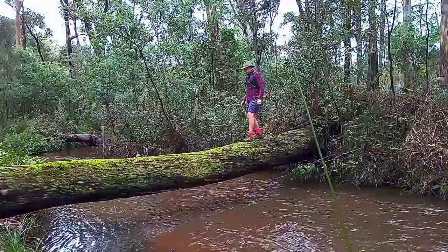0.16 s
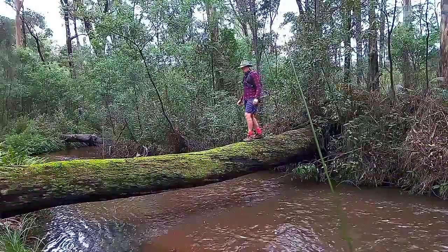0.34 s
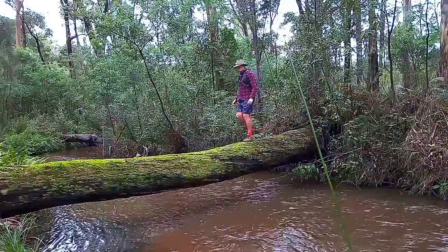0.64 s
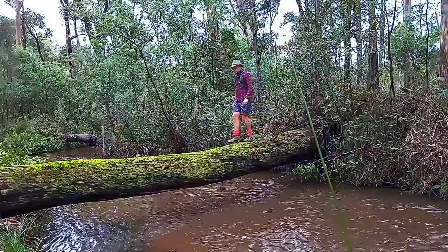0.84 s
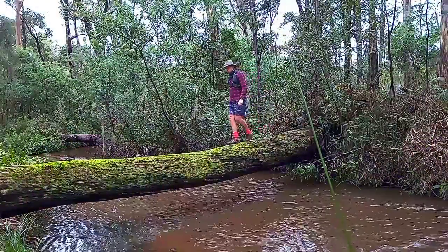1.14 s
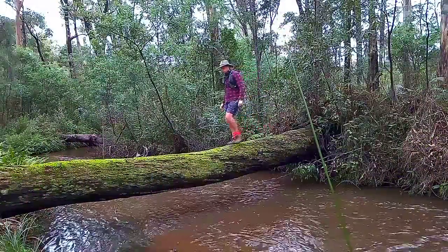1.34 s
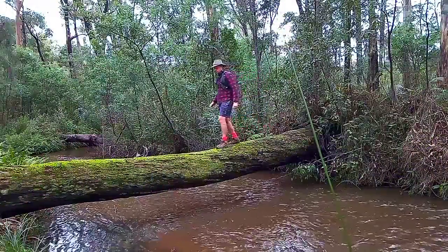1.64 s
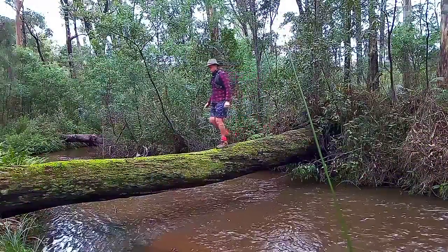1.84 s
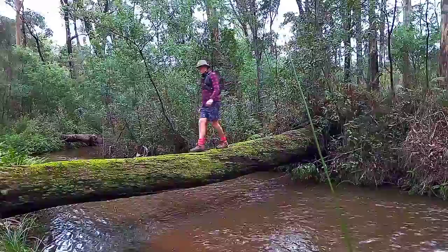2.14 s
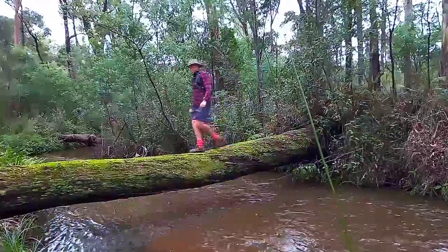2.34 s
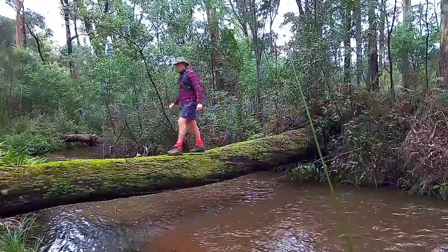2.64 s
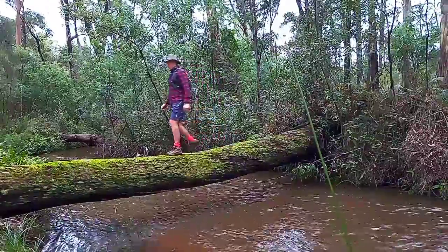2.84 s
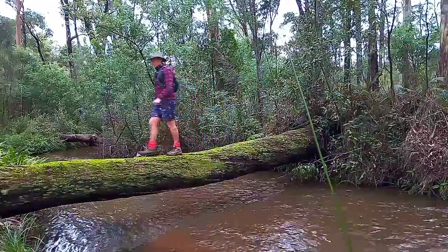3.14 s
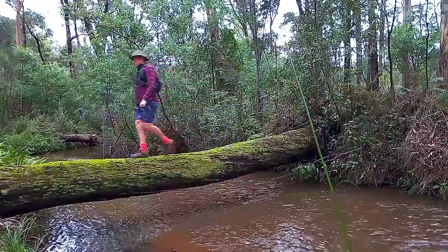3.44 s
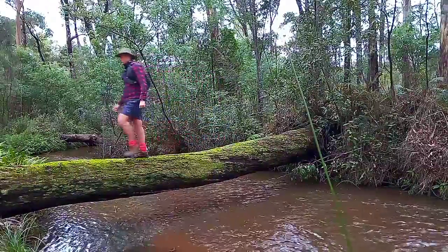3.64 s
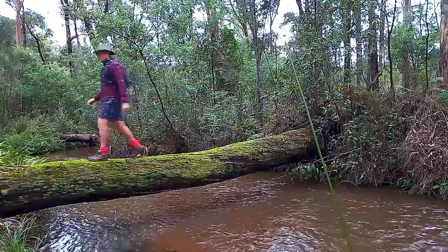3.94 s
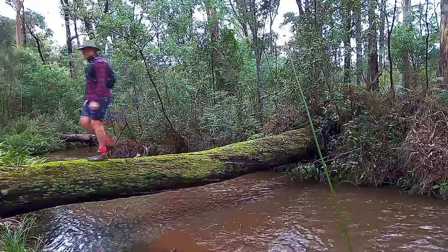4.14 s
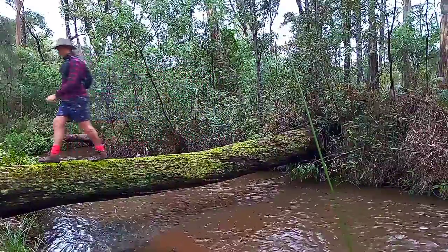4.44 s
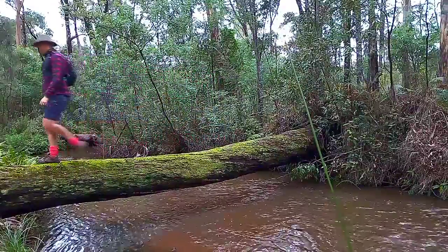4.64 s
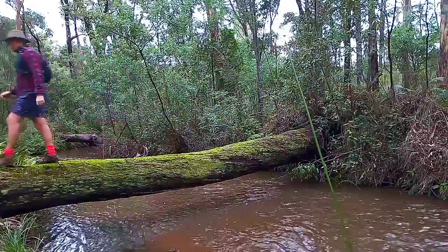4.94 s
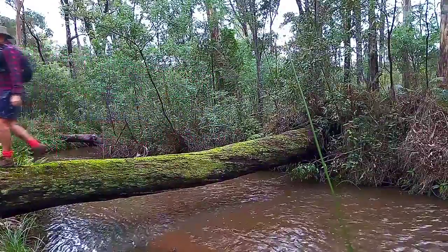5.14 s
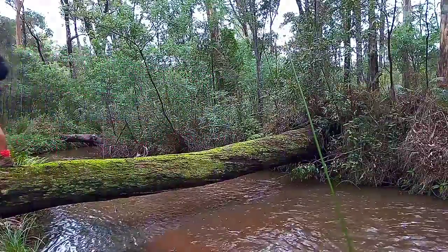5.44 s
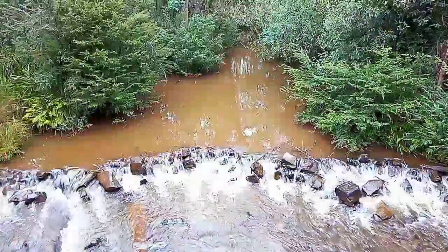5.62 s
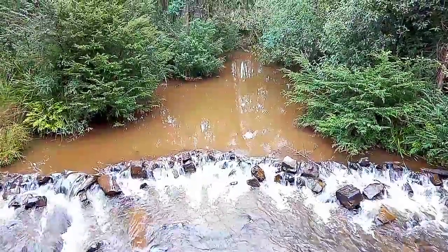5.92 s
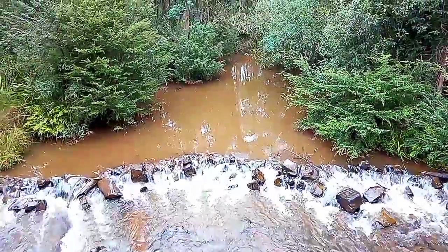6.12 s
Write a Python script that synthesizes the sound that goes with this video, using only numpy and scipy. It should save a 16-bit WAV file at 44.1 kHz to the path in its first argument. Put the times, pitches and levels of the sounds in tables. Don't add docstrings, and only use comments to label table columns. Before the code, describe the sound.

Outdoors in a wet forest, lively birds whistle, chirp, trill and rasp, their gliding calls ringing among the trunks. Drops tick on leaves around a stereo microphone, small bubbles gurgle at the bank, and a river murmurs softly behind. Light wind faintly rumbles. Near five and a half seconds a weir swells in quickly and roars steadily to the end, with a few last whistles.

```python
import sys
import numpy as np
from scipy import signal
from scipy.fft import rfft, irfft
from scipy.io import wavfile
from scipy.ndimage import uniform_filter1d, minimum_filter1d

SR = 44100
rng = np.random.default_rng(int(sys.argv[2]) if len(sys.argv) > 2 else 0)


def wrap_up_sound(samples):
    columns = np.atleast_2d(samples).T
    tamed = np.clip(columns, -1, 1)
    steps = np.round(tamed * 32767).astype(np.int16)
    wavfile.write(sys.argv[1], SR, steps)


def natural_amplitude(level_db):
    exponent = np.asarray(level_db, float) / 20
    return 10 ** exponent


N = 276948

# (time [s], level [dB])
WIND = [
    (0.12, -75),
    (0.26, -59),
    (3.83, -60),
    (3.93, -48.5),
    (4.39, -61.5),
    (5.44, -50),
    (5.73, -74),
    (6.23, -54),
    (6.28, -63),
]
# (time [s], gain [0-1])
FADE_IN = [
    (.15, 0),
    (.172, 0.3),
    (.19, 1),
]
# (frequency [Hz], density [dB per Hz])
MURMUR_COLOUR = [(29, -48), (50, -20), (69, -12), (249, -7.5), (452, -7.5), (699, -2), (1160, -1),
                 (1560, -4), (2960, -6.5), (3400, -9.5), (6170, -12), (12000, -20), (15600, -38),
                 (22000, -120)]
# (time [s], share [0-1])
DULL_START = [
    (.115, 0.94),
    (.15, 0.2),
]
# (frequency [Hz], density [dB per Hz])
RAPIDS_COLOUR = [(35, -47), (60, 13.5), (113, -33), (217, -6), (346, -8.5), (1170, -5.5), (1620, -9),
                 (2970, -8.5), (9790, -13), (16000, -14.5)]
# (time [s], level [dB])
WEIR = [
    (5.465, -61),
    (5.485, -52.5),
    (5.53, -46.5),
    (5.612, -39),
    (5.8, -39),
    (6.28, -39),
]
# (frequency [Hz], density [dB per Hz])
WEIR_COLOUR = [(53, -70.5), (90, -29), (147, -9.5), (262, -4.5), (697, -7), (941, -4), (2150, -3),
               (2320, -4.5), (3570, -13.5), (6510, -4), (7150, -10), (8000, -30.5), (10400, -68),
               (17600, -120)]
# (time [s], peak [dB], ring [Hz])
DROPS = [(.345, -40, 5000), (.6334, -38, 3520), (.743, -30.5, 5430), (.7513, -30, 5100),
         (1.0866, -33, 4900), (1.1124, -34.5, 5500), (1.1244, -32, 5600), (1.5948, -33.5, 5600),
         (1.7543, -36, 4750), (1.9528, -30.5, 7660), (2.0907, -34, 3750), (2.1535, -30, 5130),
         (2.156, -36, 3000), (2.1844, -39, 4660), (2.3956, -36, 3200), (2.4675, -37, 6100),
         (2.613, -37, 6270), (3.0094, -38, 9210), (3.052, -39, 3500), (3.329, -35.5, 4200),
         (3.433, -42, 3300), (3.477, -36.5, 3500), (3.6638, -38, 6330), (3.758, -35, 3570),
         (3.9224, -36.5, 3640), (4.0935, -36.5, 7900), (4.3919, -37, 5940), (4.4657, -35, 7600),
         (4.7022, -38, 3980), (5.471, -35, 4960), (5.806, -38, 6340), (.224, -42, 5200), (.308, -42, 5500),
         (.781, -38, 6800), (.828, -35, 2510), (1.2, -33.5, 6220), (1.655, -37, 5800), (1.916, -57, 5020),
         (1.951, -35, 6200), (2.041, -49, 6240), (2.12, -44, 5000), (2.144, -42, 6200), (2.448, -34, 3600),
         (2.554, -41, 5640), (3.148, -38, 4270), (3.466, -39, 4750), (4.421, -44, 5800), (4.458, -41, 3500),
         (4.494, -41, 5240), (4.637, -43, 4000), (1.089, -31, 2500), (1.215, -40, 2990), (4.229, -38, 2500),
         (4.104, -45, 3100)]
# (time [s], peak [dB], ring [Hz])
TICKS = [(0.55, -44, 9500), (0.5841, -45, 9900), (0.6582, -37, 9200), (0.8093, -37, 7970),
         (1.1124, -39, 10800), (1.395, -43, 11000), (1.4299, -39, 11100), (1.5422, -40, 8900),
         (1.561, -42, 9000), (1.8377, -52, 8010), (1.9123, -47, 10500), (2.2995, -43, 13600),
         (2.51, -48, 7660), (2.7492, -45, 10070), (3.0415, -48, 7400), (3.1288, -45, 8730),
         (3.1471, -42, 10030), (3.4959, -44, 8020), (3.835, -47, 11100), (3.8629, -42, 9400),
         (3.9647, -42, 7850), (4.029, -49, 9600), (4.1283, -43, 9350), (4.1465, -38, 10600),
         (4.4231, -43, 11530), (4.5279, -49, 10200), (4.6142, -47, 13400), (4.701, -42, 11600),
         (4.7589, -44, 9350), (4.9175, -46, 10600), (5.301, -49, 10100)]
# (time [s], pitch [Hz], level [dB], length [s])
GURGLES = [(.81, 1130, -52, 0.021), (1.495, 523, -48.5, 0.015), (2.066, 1810, -53, 0.014),
           (2.158, 1675, -48.5, 0.013), (2.215, 958, -54, 0.021), (3.38, 717, -54.5, 0.017),
           (3.578, 2700, -48, 0.012), (4.062, 1274, -41, 0.011), (4.455, 1400, -42, 0.012),
           (4.545, 671, -53.5, 0.021), (4.605, 717, -54, 0.029), (4.915, 668, -51, 0.022),
           (5.03, 672, -50.5, 0.028), (5.215, 1244, -51, 0.016), (5.283, 2370, -49, 0.0092)]

# (share of length [0-1], share of glide in log pitch, level [dB])
SWEEP = [(0, 0.014, -8), (.16, .16, -2), (.84, .84, -0.5), (1, 0.89, -5)]
ARCH = [(0, -0.019, -6), (.4, 0.96, 1), (.7, .6, -9.5), (1, -0.27, -7)]
DIVE = [(0, 0.017, 7.5), (.065, .58, -4), (.19, 1, -9.5), (.52, .9, -10.5), (.76, .88, -12), (1, 1, -12)]
SETTLE = [(0, 0.017, -24), (.16, .36, -7), (.33, .8, -0.5), (.55, .99, 0), (.86, 1, -2.5), (1, 1.03, -35)]
# (time [s], length [s], level [dB], glide from [Hz], glide to [Hz])
SWEEPS = [(0.0079, 0.028, -50.5, 5640, 5570), (0.17, 0.01, -62, 9300, 11000),
          (0.17, .012, -65, 10700, 11500), (0.398, 0.03, -55, 1800, 2400), (0.05, 0.033, -49, 1500, 1180),
          (0.268, 0.016, -51, 2350, 1950), (.166, .014, -56, 2700, 2400), (.404, .016, -53, 1300, 1320),
          (0.53, .014, -54, 2100, 1700), (.448, 0.024, -48, 740, 695), (1.04, 0.06, -50, 903, 955),
          (1.281, 0.052, -50, 954, 940), (4.2, 0.12, -71, 9500, 8000), (4.15, 0.051, -63, 10600, 9300),
          (4.3, 0.04, -63, 7600, 7100), (3.863, 0.022, -51, 3890, 3400), (5.708, 0.051, -38.5, 1550, 2100),
          (5.766, 0.043, -32.5, 2404, 2370), (5.925, 0.11, -38, 2617, 1700), (6.223, .07, -37, 3160, 2760)]
DIVES = [
    (2.972, 0.156, -41, 2036, 1190),
    (3.316, .134, -44.5, 2110, 1111),
]
SETTLES = [
    (2.485, 0.091, -31.5, 2670, 2455),
]
RASP_ARCHES = [
    (4.78, .052, -40, 3150, 3580),
    (5.15, 0.05, -43, 4350, 4900),
    (3.75, 0.079, -50.5, 3400, 3700),
]
RASP_SWEEPS = [
    (5.168, 0.028, -44, 2130, 1950),
    (.016, .034, -36.5, 2450, 1830),
    (.16, 0.026, -61, 9200, 10000),
    (.248, .024, -62, 9000, 10000),
]
# (time [s], pitch [Hz], level [dB])
CHIRPS = [
    [(.147, 1310, -58), (.155, 1400, -42), (.162, 1440, -39), (.172, 1270, -39), (.176, 1240, -52),
     (.184, 1300, -45), (.192, 1280, -58)],
    [(.237, 1500, -53), (.243, 1530, -39), (.254, 1470, -34), (.26, 1350, -46), (.265, 1300, -37),
     (.274, 1210, -43), (.28, 1190, -58)],
]
HOOKS = [
    [(0.944, 1760, -56), (0.95, 1796, -41), (0.96, 1786, -33), (0.978, 1900, -29), (0.992, 1889, -32),
     (1.01, 1687, -33), (1.022, 1497, -37.5), (1.035, 1480, -43)],
    [(1.188, 1770, -52), (1.196, 1780, -37), (1.204, 1835, -29.5), (1.228, 1820, -32), (1.242, 1670, -34),
     (1.256, 1479, -38), (1.266, 1481, -47)],
]
RASPS = [
    [(4.736, 1950, -58), (4.76, 2000, -51), (4.773, 2030, -46), (4.785, 2000, -37.5), (4.8, 1880, -38),
     (4.812, 1740, -39), (4.825, 1560, -45), (4.836, 1430, -55)],
    [(5.072, 2050, -60), (5.1, 2100, -45), (5.114, 2060, -37), (5.128, 1940, -36.5), (5.143, 1800, -38),
     (5.156, 1620, -43), (5.172, 1430, -54)],
]
# (time [s], pitch [Hz], level [dB])
OPENING_FALL = [(0, 5670, -42), (.008, 5400, -47), (.012, 4600, -45), (.015, 4000, -52), (.019, 3550, -42),
                (.023, 3400, -58)]
QUICK_RISE = [(.776, 3030, -44), (.786, 3510, -38.5), (0.797, 3780, -32.5), (.803, 4020, -38),
              (.812, 4420, -44), (0.829, 5870, -41.5), (.85, 6530, -44.5)]
THIN_RISE = [(.885, 4770, -70), (.92, 4880, -60), (.935, 4860, -55), (1.1, 5080, -54.5), (1.2, 5230, -56),
             (1.39, 5440, -47), (1.41, 5820, -65), (1.43, 5500, -42.5), (1.45, 5605, -38),
             (1.479, 5530, -54), (1.66, 5630, -75)]
STEP_UP = [(1.435, 1767, -58), (1.455, 1853, -32), (1.479, 2094, -35), (1.494, 2570, -36.5),
           (1.515, 2870, -44.5), (1.534, 2997, -30.5), (1.575, 2994, -46), (1.601, 3012, -33.5),
           (1.63, 3050, -74)]
WHIP_UP = [(1.59, 770, -47.5), (1.615, 797, -51.5), (1.64, 988, -55), (1.665, 1351, -37),
           (1.685, 2735, -43.5), (1.7, 3980, -43), (1.712, 7100, -55)]
WHIP_DOWN = [(2.256, 7150, -78), (2.27, 7050, -46), (2.285, 6690, -45.5), (2.294, 5300, -65),
             (2.303, 4020, -35.5), (2.31, 3600, -32), (2.325, 3000, -32), (2.332, 2760, -46)]
WHIP_LANDING = [(2.331, 2790, -48), (2.338, 2590, -33), (2.357, 2350, -31.5), (2.364, 2310, -44),
                (2.372, 2290, -35), (2.388, 2265, -38), (2.402, 2256, -54)]
STEP_DOWN = [(2.644, 1956, -54), (2.652, 1920, -35), (2.66, 1884, -31), (2.673, 1778, -30),
             (2.68, 1600, -40), (2.688, 1483, -39.5), (2.712, 1259, -44), (2.74, 1250, -50),
             (2.78, 1230, -58)]
OVER_THE_TOP = [(2.845, 1400, -51), (2.859, 1610, -34), (2.88, 1967, -31.5), (2.901, 2565, -39.5),
                (2.925, 2870, -41), (2.944, 2766, -46), (2.961, 2606, -32), (2.97, 2550, -79)]
QUICK_FALL = [(4.543, 3500, -56), (4.55, 3450, -41), (4.56, 2750, -39), (4.572, 2150, -39),
              (4.586, 1620, -40), (4.6, 1250, -56)]
LONG_SETTLE = [(4.805, 2700, -52), (4.83, 2380, -52), (4.842, 2150, -41), (4.85, 2050, -50),
               (4.858, 1960, -42), (4.864, 1900, -52), (4.872, 1860, -42), (4.93, 1775, -40),
               (4.968, 1760, -48)]
UP_AND_DOWN = [(5.355, 2225, -73), (5.37, 2360, -37.5), (5.4, 2555, -42), (5.444, 2628, -39.5),
               (5.47, 2270, -45.5), (5.494, 1737, -39.5), (5.51, 1380, -60)]
BUZZ = [(.39, 3254, -56), (.405, 3206, -41), (.43, 3354, -33.5), (.455, 3560, -36.5), (.47, 3730, -42),
        (.487, 3830, -55)]
SCREECH = [(4.105, 1910, -67), (4.13, 1822, -42), (4.162, 1750, -35.5), (4.21, 1740, -33),
           (4.27, 1610, -35), (4.341, 1443, -45.5), (4.36, 1345, -38)]
TRILL_START = [(3.668, 2900, -64), (3.682, 2920, -53), (3.696, 2870, -46), (3.71, 2800, -49),
               (3.717, 2750, -60)]
TRILL = [(3.7035, 2725, -69), (3.716, 2640, -58), (3.725, 2603, -50), (3.76, 2480, -44.5),
         (3.8, 2520, -47.5), (3.83, 2405, -40), (3.85, 2090, -51.5), (3.885, 1550, -55)]
# (beats [per s], level depth [0-1], pitch swing [Hz], overtones [dB], hoarseness [dB])
FLUTTER = [(210.6, 0.5, 320, -31, -27), (167.3, 0.28, 64, -13, -30), (53.7, 0.9, 110, -27, -26),
           (81, 0.97, -70, -14, -13.5), (71, 0.8, -80, -16, -14.5), (81, 0.5, 130, -21, -39),
           (121.5, .5, 340, -22, -31), (138.3, 0.4, 80, -34, -20), (110, 0.6, 150, -30, -22),
           (154, 0.46, 150, -23, -25), (190, 0.6, 450, -40, -40), (189, .7, 400, -40, -40),
           (73, 0.5, 93, -30, -24)]
BEAT_FADE = [
    (.65, 1),
    (1, .35),
]
# (start [s], end [s])
TRILL_SMOOTHS_S = (3.8, 3.83)
# (frequency [Hz], gain [dB])
THROAT = [(2500, 0), (3050, -3), (3600, 2), (4500, 1), (5500, -1)]
WHISTLE_OVERTONES_DB = [-25.5, -37, -40]
PURE_OVERTONES_DB = [-33, -35.5, -32]
REEDY_OVERTONES_DB = [-15, -32, -24]


def rms_one(x):
    return x / np.sqrt(np.mean(x ** 2) + 1e-20)


def in_time(rows):
    return np.interp(np.arange(N) / SR, *np.transpose(rows))


def drift(rate, count=N):
    knot_rate, settle = 400, 50
    knots = rng.standard_normal(int(N / SR * knot_rate) + 60)[:int(count / SR * knot_rate) + 60]
    r = np.exp(-2 * np.pi * rate / knot_rate)
    slow = signal.lfilter([1], [1, -2 * r, r * r], knots)[settle:]
    return np.interp(np.arange(count) / SR * knot_rate, np.arange(len(slow)), rms_one(slow))


def cut(x, hz, kind, order=2):
    return signal.sosfilt(signal.butter(order, hz, kind, fs=SR, output="sos"), x)


def colour(x, spectrum):
    hz, level_db = np.transpose(spectrum)
    bins = np.maximum(np.arange(N // 2 + 1) * SR / N, 1)
    return rms_one(irfft(rfft(x) * natural_amplitude(np.interp(np.log(bins), np.log(hz), level_db)), N))


def wind():
    rumble = cut(rng.standard_normal((3, N)), [15, 34], "band", order=3)
    shared, left, right = cut(rumble, 24, "low", order=4)
    return natural_amplitude(in_time(WIND)) * rms_one(np.array([1.37 * left + 0.48 * shared, right + 0.69 * shared]))


def water(spectrum, patchy_db, grains_per_s, grain_db, spread_db, channels):
    white = rfft(rng.standard_normal((channels, N)))
    together = drift(9.5)
    octave = np.log2(np.maximum(np.arange(N // 2 + 1) * SR / N, 100) / 100)
    body = 0
    for k in range(9):
        flicker = natural_amplitude(patchy_db * (together + drift(25)))
        share = np.clip(1 - np.abs(octave - k), 0, 1)
        body = body + flicker * irfft(white * share, N)
    born = rng.random(N) < grains_per_s * natural_amplitude(4 * drift(4)) / SR
    sizes = born * natural_amplitude(spread_db * np.minimum(rng.exponential(1, N), 2.4))
    dealt = rng.integers(0, 3, N)
    spray = 0
    for k, band in enumerate([(2500, 7000), (5000, 12000), (8000, 18000)]):
        puffs = signal.lfilter([1], [1, -.98], sizes * (dealt == k))
        hiss = rng.standard_normal(N) + 0.5 * rng.standard_normal((channels, N))
        spray = spray + cut(puffs * hiss, band, "band")
    return colour(rms_one(body) + natural_amplitude(grain_db) * rms_one(spray), spectrum)


def river_murmur():
    murmur = water(MURMUR_COLOUR, patchy_db=1.1, grains_per_s=40, grain_db=-9.5, spread_db=2.5, channels=1)
    murmur = natural_amplitude(-54) * cut(murmur, 11900, "low", order=20)
    treble = signal.sosfiltfilt(signal.butter(4, 6000, "high", fs=SR, output="sos"), murmur)
    return murmur - in_time(DULL_START) * treble


def rapids():
    wash = water(RAPIDS_COLOUR, patchy_db=1.0, grains_per_s=90, grain_db=-4, spread_db=4, channels=2)
    return natural_amplitude(-57.5) * cut(wash, 82, "high", order=3) * natural_amplitude(np.array([[-.6], [.6]]))


def weir():
    roar = water(WEIR_COLOUR, patchy_db=.45, grains_per_s=1900, grain_db=-6.5, spread_db=6, channels=1)
    heard = np.arange(N) > WEIR[0][0] * SR
    return cut(roar, 7900, "low", order=8) * natural_amplitude(in_time(WEIR) + 5) * heard


def ring(clicks, hz, t60):
    r, w = natural_amplitude(-60 / (t60 * SR)), 2 * np.pi * hz / SR
    return signal.lfilter([0, np.sin(w)], [1, -2 * r * np.cos(w), r * r], clicks + 1e-18)


def drops():
    small_per_s, small_db, leaf_low_hz = 1, -46, 3400
    out, t = np.zeros((2, N + SR)), np.arange(1200) / SR
    when, size, leaf = rng.random((int(small_per_s * N / SR), 3)).T
    small = zip(0.16 + when * (N / SR - .2), small_db - 8 * size, leaf_low_hz * 2 ** leaf)
    falls = [*DROPS, *small, *TICKS]
    chance = rng.standard_normal((len(falls), len(t)))
    for (s, peak_db, hz), noise in zip(falls, chance):
        pan_db = 2.7 * noise[-1] - 1
        tick = noise * (np.exp(-t / 0.0022) + 0.23 * np.exp(-t / 0.015))
        splash = cut(tick, [0.28 * hz, min(1.25 * hz, 18000)], "band")
        sound = rms_one(ring(tick, hz, 0.0033)) + natural_amplitude(-9) * rms_one(splash)
        sound = sound / np.max(np.abs(sound)) * natural_amplitude(peak_db - 4)
        at = round(s * SR)
        out[:, at:at + len(t)] += sound * natural_amplitude(pan_db / 2 * np.array([[1], [-1]]))
    return out[:, :N]


def gurgles():
    babble_per_s, babble_db = 45, -53
    chance = rng.random((int(babble_per_s * N / SR), 4))
    hollow = 640 + 400 * chance[:, 1]
    pitches = np.where(chance[:, 1] < .4, hollow, 500 * 9.07 ** chance[:, 1])
    lengths = (6 + 14 * chance[:, 3]) / pitches
    babble = np.c_[chance[:, 0] * N / SR, pitches, babble_db - 9 * chance[:, 2], lengths]
    out = np.zeros(N + SR)
    for s, hz, level_db, length in [*GURGLES, *babble]:
        t = np.arange(int(length * SR)) / SR
        at = round(s * SR)
        swell = np.sin(np.pi * (t / length) ** 0.75)
        tone = np.sin(2 * np.pi * hz * t * (1 + 0.029 * t / length))
        out[at:at + len(t)] += natural_amplitude(level_db + 2) * swell * tone
    return out[:N]


def fading_hiss():
    t, white = np.arange(N) / SR, rng.standard_normal((2, N))
    high = natural_amplitude(-62.5 - 120 * t) * rms_one(cut(white[0], [8600, 11700], "band", order=6))
    low = natural_amplitude(-48.5 - 260 * t) * rms_one(cut(white[1], [2100, 5900], "band", order=6))
    return high + low


def forest(x):
    t60_s, tail_db, near_db = 1.17, -16.5, -10
    t = np.arange(int(1.5 * SR)) / SR
    white = rng.standard_normal((3, len(t)))
    tail = cut(white[0], 3900, "low") * natural_amplitude(-60 * t / t60_s)
    tail += cut(white[1], 3700, "high") * natural_amplitude(-110 * t / t60_s)
    tail *= (1 - np.exp(-t / 0.0096)) * (1 + natural_amplitude(-18 + 27 * t))
    valley = cut(white[1], [2300, 3400], "band")
    tail += natural_amplitude(-7.5 - 10.3 * t) * np.minimum(t / 0.063, 1) * valley
    near = white[2] ** 3 * np.exp(-t / 0.025) * (t > .003)
    echoes = natural_amplitude(tail_db) * tail / np.sqrt(np.sum(tail ** 2))
    echoes += natural_amplitude(near_db) * near / np.sqrt(np.sum(near ** 2))
    return signal.fftconvolve(x, echoes)[:N]


def shaped(shape, notes):
    share, glide, shape_db = np.transpose(shape)
    return [np.c_[s + length * share, from_hz * (to_hz / from_hz) ** glide, level_db + shape_db]
            for s, length, level_db, from_hz, to_hz in notes]


def note(rows, partials, flutter=None):
    s, hz, level_db = np.transpose(rows)
    first, last = round(s[0] * SR), min(round(s[-1] * SR), N)
    t = np.arange(first, last) / SR
    count = len(t)
    pitch = uniform_filter1d(np.interp(t, s, hz), min(count // 8, 220))
    height = np.interp(t, s, natural_amplitude(level_db)) * np.sqrt(2)
    height = height * natural_amplitude(0.59 * drift(36, count))
    beat, hoarse, upper = 1, 0, 0
    if flutter:
        rate, beat_s, depth, swing_hz, hoarse_db = flutter
        turn = 2 * np.pi * rate * (t - beat_s) + 0.16 * drift(41, count)
        strength = 1 - np.interp(t, TRILL_SMOOTHS_S, [0, 1]) * (s[0] < TRILL_SMOOTHS_S[0])
        if swing_hz < 0:
            strength = strength * np.interp((t - s[0]) / (s[-1] - s[0]), *np.transpose(BEAT_FADE))
        skewed = turn + 0.46 * (np.cos(turn) - 1)
        beat = 1 + strength * np.clip(depth, 0, 1) * np.cos(skewed)
        pitch = pitch + strength * swing_hz * (np.sin(turn) + 0.292 * drift(147, count))
        hoarse = natural_amplitude(hoarse_db + 15)
        breath = cut(rng.standard_normal(SR)[:count], [1400, 5600], "band", order=4)
        upper = natural_amplitude(hoarse_db - 1) * rms_one(breath)
    phase = 2 * np.pi * np.cumsum(pitch) / SR
    for multiple, over_db in partials:
        unsteady = rms_one(signal.lfilter([1], [1, -1.966, .966289], rng.standard_normal(SR)[:count]))
        wobble = (1 + hoarse * 1.35 * unsteady) / (1 + hoarse) * natural_amplitude(2 * drift(16, count))
        if flutter:
            wobble = wobble * natural_amplitude(np.interp(multiple * pitch, *np.transpose(THROAT)))
        upper = upper + natural_amplitude(over_db) * wobble * np.sin(multiple * phase) * (multiple * pitch < 12000)
    upper = upper * (np.max(height) / height) ** (0.71 if flutter else -0.3)
    voice = beat * np.sin(phase) + np.sqrt(beat) * upper
    out = np.zeros(N)
    out[first:last] = height * voice * signal.windows.tukey(count, .08)
    return out


def birds():
    whistles = [WHIP_UP, STEP_DOWN, QUICK_FALL, *shaped(SWEEP, SWEEPS), *CHIRPS, *HOOKS]
    pure = [OPENING_FALL, QUICK_RISE, STEP_UP, WHIP_DOWN, WHIP_LANDING, LONG_SETTLE, OVER_THE_TOP,
            UP_AND_DOWN, *shaped(SETTLE, SETTLES)]
    reedy = [THIN_RISE, *shaped(DIVE, DIVES)]
    buzzes = [BUZZ, SCREECH, TRILL, *RASPS, *shaped(ARCH, RASP_ARCHES), *shaped(SWEEP, RASP_SWEEPS),
              TRILL_START]
    out = np.zeros(N)
    for calls, overtones_db in [(whistles, WHISTLE_OVERTONES_DB), (pure, PURE_OVERTONES_DB),
                                (reedy, REEDY_OVERTONES_DB)]:
        for rows in calls:
            out += note(rows, zip(range(2, 5), overtones_db))
    for rows, (rate, depth, swing_hz, over_db, half_db) in zip(buzzes, FLUTTER):
        whole = zip(range(2, 8), over_db + np.array([-1.5, -3, -16, -23, -17.5, -19]))
        half = zip(np.arange(4) + .5, half_db + np.array([-8, 0, -2.5, -10]))
        out += note(rows, [*whole, *half], (rate, rows[0][0], depth, swing_hz, half_db))
    return out


def limit(x):
    ceiling_db, hold_s = -26, .004
    width = round(hold_s * SR)
    top = uniform_filter1d(-minimum_filter1d(-np.abs(x), width), width)
    return x / (1 + (top / natural_amplitude(ceiling_db)) ** 6) ** (1 / 6)


def scene():
    wide = in_time(FADE_IN) * (wind() + rapids())
    calls = birds() + gurgles()
    return limit(calls + forest(calls)) + river_murmur() + weir() + drops() + fading_hiss() + wide


def narrow(x, margin_db):
    mid, side = (x[0] + x[1]) / 2, (x[0] - x[1]) / 2
    hz, _, spectra = signal.stft([mid, side], SR, nperseg=2048)
    mid_power, side_power = uniform_filter1d(np.abs(spectra) ** 2, size=13, axis=1)
    needed_db = margin_db + 9 * np.clip(np.log2(1500 / (hz[:, None] + 1)), 0, 4)
    kept = mid_power < side_power * natural_amplitude(2 * needed_db)
    side = signal.istft(spectra[1] * kept, SR, nperseg=2048)[1][:N]
    return np.array([mid + side, mid - side])


def top_cut(x):
    return signal.sosfilt(signal.butter(12, 16160, fs=SR, output="sos"), x)


def record(dry):
    cutoff_hz = 15830
    below = np.arange(N // 2 + 1) * SR / N < cutoff_hz
    mix = irfft(rfft(narrow(dry, margin_db=15.5)) * below, N)
    return top_cut(mix)


dry = scene()
out = record(dry)
wrap_up_sound(out)
```